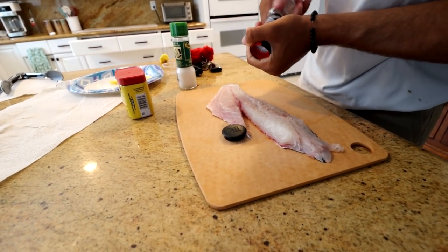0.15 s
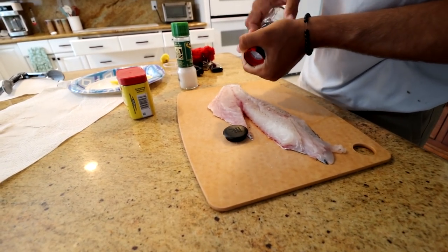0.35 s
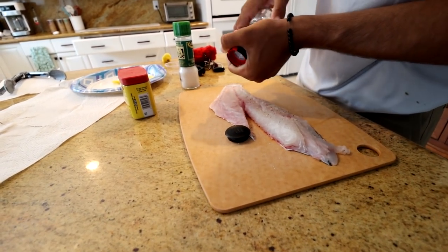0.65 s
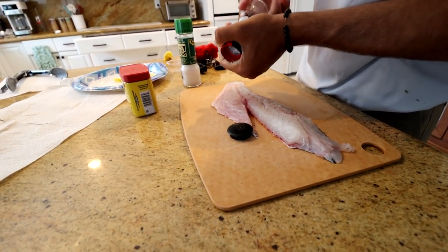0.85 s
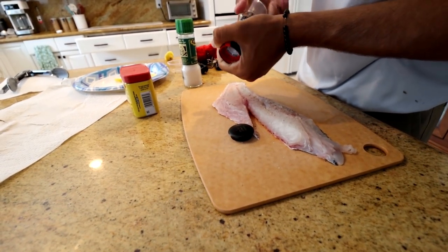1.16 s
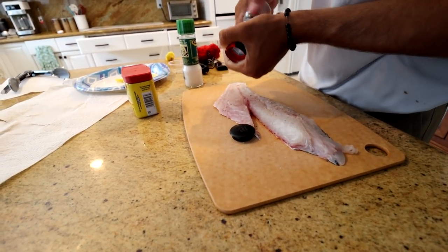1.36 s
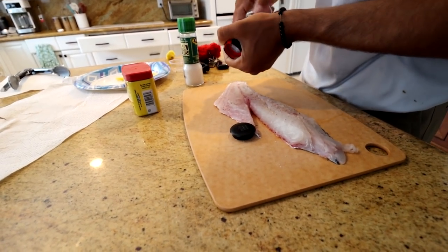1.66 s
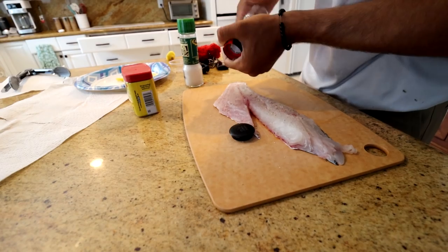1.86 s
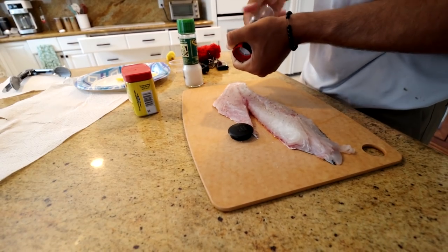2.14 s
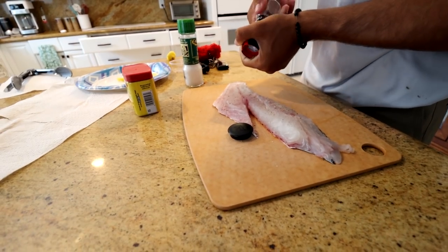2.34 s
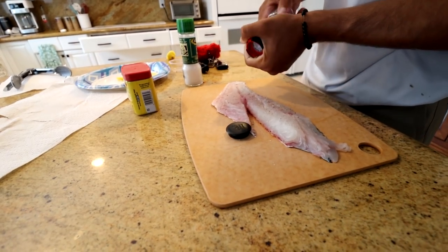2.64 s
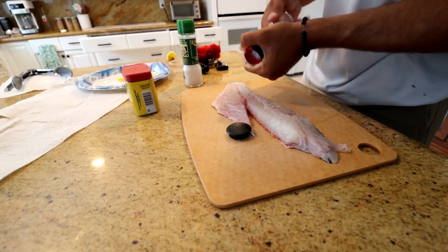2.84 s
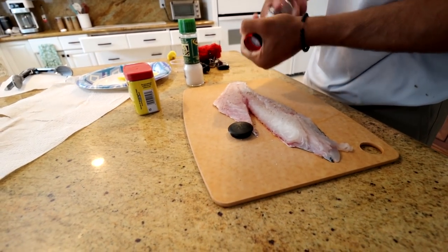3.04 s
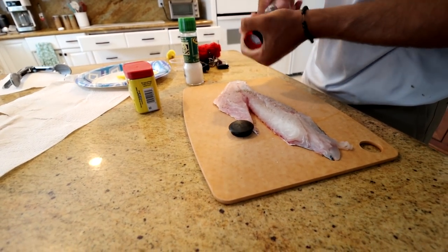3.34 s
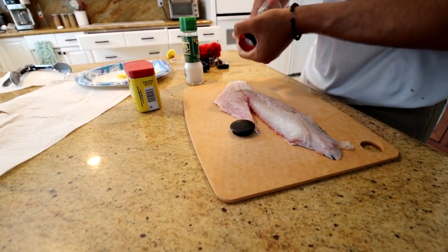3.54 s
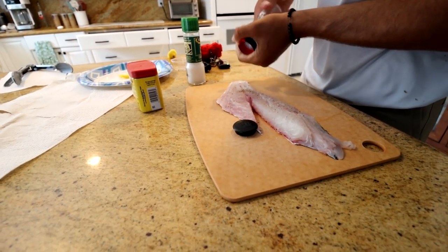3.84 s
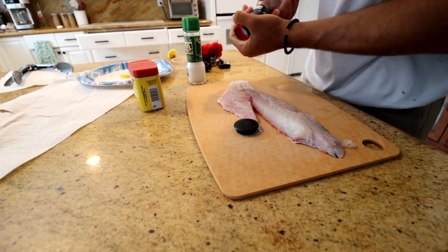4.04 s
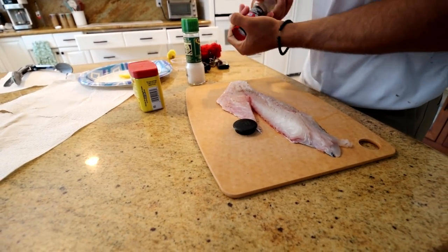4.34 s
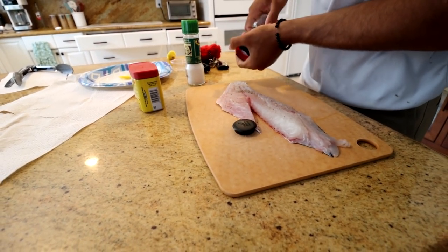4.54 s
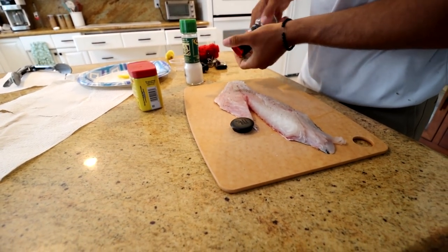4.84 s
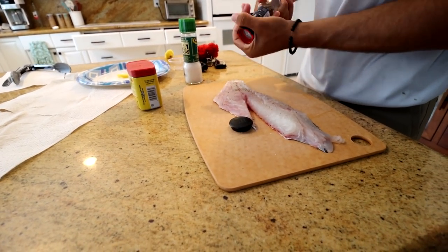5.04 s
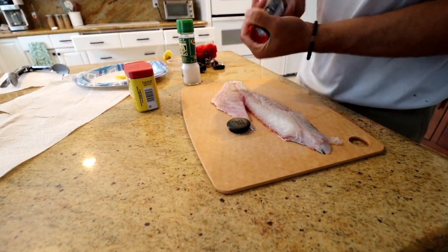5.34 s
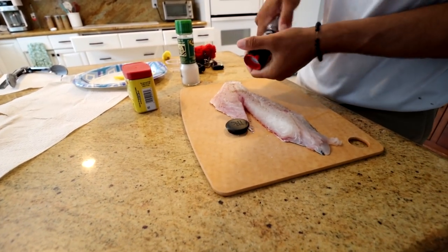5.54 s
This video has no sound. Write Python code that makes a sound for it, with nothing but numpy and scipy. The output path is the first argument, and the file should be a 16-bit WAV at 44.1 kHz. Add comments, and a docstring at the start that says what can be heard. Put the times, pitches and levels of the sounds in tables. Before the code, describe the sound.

A hand-twisted pepper grinder cracks peppercorns in steady, crunchy ratcheting bursts, about three a second, in a hard kitchen with a faint hum.

```python
"""Hand-twisted pepper grinder in a kitchen

A pepper grinder is worked over a counter, about three twists a second. Short coloured noise bursts make
peppercorns snap, crumbs crunch and loose corns tick; decaying sines make the housing thud.
Grains of contact make the hand's slides. Early echoes and a hard room ring on over an appliance hum."""
import sys
import numpy as np
from scipy import signal
from scipy.fft import rfft, irfft, next_fast_len
from scipy.io import wavfile

SR = 44100
rng = np.random.default_rng(int(sys.argv[2]) if len(sys.argv) > 2 else 0)


def persist_wave(psi):
    """Save psi, clipped to +-1, as 16-bit WAV."""
    counts = np.round(np.clip(psi, -1, 1) * 32767).astype(np.int16)
    wavfile.write(sys.argv[1], SR, np.atleast_2d(counts).T)


N = 251097

# whole peppercorns snapping: start_s, relative level_db, body_over_treble_db, sparkle_db
CRACKS = [(0.0263, -31.5, -5, -1), (0.2244, -23.5, -3, -6), (0.2612, -22.5, -2.5, -8), (.332, -29, -2, -2),
          (.52, -24.5, 1, -1), (0.5807, -22, 2, -14), (0.5853, -22.5, 8, -7), (.6059, -20.5, -3, 1),
          (0.8487, -11.5, -10.5, 4), (.8908, -24.5, -3, 10), (.902, -29, -7, 1), (.918, -22, 1, -1),
          (1.1347, -19.5, -6.5, 9), (1.1455, -10.5, -9.5, 3), (1.1733, -20, 6, -1), (1.1848, -23, 3, -5),
          (1.1951, -23, -1.5, 8), (1.201, -22, -6.5, 1), (1.2094, -23.5, 0, -1), (1.4582, -13, 7, -3),
          (1.4705, -18, -2, 2), (1.4997, -18.5, -6.5, 3), (1.7443, -26.5, -1, -2), (1.7631, -20.5, 8, -3),
          (1.7858, -21, -9, 0), (1.794, -17.5, 8, 0), (1.7987, -18, -4, 3), (1.8376, -26, -5, 10),
          (2.0662, -13, -2.5, 2.5), (2.0838, -16.5, 1, -7), (2.1075, -15.5, -2.5, 4),
          (2.1156, -15.5, -2, 2), (2.148, -25, -5, 5), (2.1683, -30, -10, -2), (2.3783, -22, -9, -16),
          (2.386, -23, -8, 7), (2.4067, -13.5, -5, 0.5), (2.4168, -22, 4, 7), (2.477, -28.5, -9, -8),
          (2.735, -23, -3.5, -2), (2.7559, -21.5, -12, 4), (2.7603, -6.5, 2, -1), (2.779, -11.5, -6, -5),
          (2.7827, -16.5, -3.5, 0), (3.0961, -22, -5, 3), (3.1173, -9, 0.5, 1), (3.176, -25, -11, -1),
          (3.187, -27, -8, 3), (3.414, -24.5, -8, -9), (3.4207, -18.5, -9.5, -10), (3.4405, -22, -1, 8),
          (3.4555, -17, -11, -8), (3.4749, -19, -2.5, 5), (3.48, -20.5, -17, -15), (3.494, -22, -1.5, 2),
          (3.516, -24.5, -8, -1), (3.7296, -24.5, -1, -3), (3.7522, -22, 15, 7), (3.7696, -13, -4, -2),
          (4.0399, -24, -2.5, -6), (4.0599, -27.5, -4, -5), (4.0885, -21, -10, 0), (4.136, -23, -0.5, 0),
          (4.3703, -20.5, -10.5, -1), (4.3813, -23, 0, -4), (4.418, -24, 0, -6), (4.4215, -22, -1.5, -5),
          (4.4402, -25, -16, -3), (4.7168, -18.5, -0.5, 1), (4.723, -20.5, -5.5, -12),
          (4.7554, -16.5, 3.5, 5), (5.0583, -27, 5, -4), (5.3992, -32.5, 3, -2), (5.4211, -12.5, -9.5, 1),
          (5.425, -13, 4.5, -3), (5.4386, -18, -2.5, 6), (5.4446, -20.5, -22, -5), (5.4513, -20, 3, -1),
          (5.4687, -21, -5, 1), (5.5489, -32.5, -3, 3)]
# twists of the burr: start_s, hardest_s, end_s, relative crunch_db, body_over_treble_db,
# body_ring_hz, burr_ring_hz, relative thud_db; one that ends before it starts has no crunch
TWISTS = [(0, 0.008, 0.024, -38, -7, 3020, 9000, -61), (0.206, .26, .3, -32, 1, 2600, 8900, -51),
          (0.517, 0.579, 0.59, -28, -1, 3560, 8700, -49), (.826, 0.851, 0.87, -24.5, -1, 3620, 8540, -43),
          (1.124, 1.143, 1.146, -25, 3, 2700, 9300, -42), (1.44, 1.471, 1.49, -22.5, -1, 2940, 9000, -47),
          (1.757, 1.768, 1.825, -24, -2.5, 3930, 7500, -34.5), (2.062, 2.1, 2.1, -31.5, 3, 2830, 8600, -48),
          (2.406, 2.418, 2.434, -20.5, 1, 2300, 7460, -39), (2.76, 2.761, 2.783, -21.5, 3, 2250, 9000, -35),
          (3.103, 3.126, 3.165, -25, -0.5, 3700, 8000, -38),
          (3.431, 3.461, 3.464, -23.5, 1, 3570, 7800, -42),
          (3.727, 3.772, 3.812, -30.5, 2.5, 3530, 7050, -48),
          (4.037, 4.11, 4.14, -31, 1.5, 2370, 8300, -46), (4.363, 4.42, 4.45, -29, -1, 1870, 8440, -47),
          (4.705, 4.708, 4.79, -27, -2, 1950, 8380, -37), (5.047, 5.061, 5.112, -33, -3, 4000, 8900, -54),
          (5.419, 5.423, 5.27, -23, 1, 1800, 9000, -49)]
# tone colour of the grinder: frequency_hz, relative density_db (per Hz)
GRINDER_COLOUR = [(120, -32), (450, -14.5), (1000, -18.5), (1320, -16.5), (1720, -2.5), (2500, -0.05),
                  (3050, -1), (3700, 0.65), (4600, -4), (6200, -5.5), (7500, 0.5), (8800, 2.5),
                  (10600, -11.5), (12200, -8), (15500, -13.5)]


def amp(db):
    """Decibels to amplitude."""
    return 10 ** (np.asarray(db) / 20)


def unit(x):
    """Scale to rms 1."""
    return x / np.sqrt(np.mean(x ** 2) + 1e-20)


def along(points, hz):
    """Read a curve of (Hz, value) points on a log frequency axis."""
    f, v = np.transpose(points)
    return np.interp(np.log(hz + 1), np.log(f + 1), v)


def add(track, s, sound):
    """Mix a sound into a track at time s, in seconds."""
    i = int(np.clip(round(s * SR), 0, N - 1))
    track[i:i + len(sound)] += sound[:N - i]


def filtered(x, response):
    """Multiply the spectrum of x by a gain that depends on frequency."""
    size = next_fast_len(N + SR // 2)
    gain = response(np.fft.rfftfreq(size, 1 / SR))
    return irfft(rfft(x, size) * gain, size)[:N]


def causal(gain_db, size=1024):
    """Minimum-phase impulse response of energy 1 with the given dB shape against Hz."""
    cepstrum = irfft(np.log(amp(gain_db(np.fft.rfftfreq(size, 1 / SR)))))
    # fold backward time onto forward time, so that the response starts at once
    cepstrum[1:size // 2] *= 2
    cepstrum[size // 2 + 1:] = 0
    return unit(irfft(np.exp(rfft(cepstrum)))) / np.sqrt(size)


def strength(x):
    """Rms of the first 2 ms."""
    return np.sqrt(np.mean(x[:SR // 500] ** 2))


def snap(body_db, sparkle_db, ring_hz, size=512):
    """One fracture: a milliseconds-long noise burst, coloured by the grinder and one resonance."""
    t60_s, rise_s = 0.0085, 0.00013
    ring_db, ring_octaves = 7.0, 0.13
    split_hz, sparkle_hz = 5500, 10000
    t = np.arange(1, size + 1) / SR
    burst = rng.standard_normal(size) * amp(-60 * t / t60_s) * (1 - np.exp(-t / rise_s))

    def colour(hz):
        # low resonances ring more clearly than high ones
        clarity = min(1, 2500 / ring_hz)
        ring = ring_db * clarity * np.exp(-(np.log2((hz + 1) / ring_hz) / ring_octaves) ** 2)
        sparkle = sparkle_db * (1 + np.tanh((hz - sparkle_hz) / 900)) / 2
        return along(GRINDER_COLOUR, hz) + ring + sparkle

    click = np.convolve(burst, causal(colour))[:size]
    # rebalance body against treble
    low_pass = 1 / (1 + (np.fft.rfftfreq(2 * size, 1 / SR) / split_hz) ** 10)
    body = irfft(rfft(click, 2 * size) * low_pass)[:size]
    treble = click - body
    click = amp(body_db) * body / strength(body) + treble / strength(treble)
    return click / strength(click)


def cracks():
    """Whole corns snap clearly, ringing the body or the burr at the pitches of the nearest twist."""
    thin_db = -1  # a snap with less body than this rings the burr
    out = np.zeros(N)
    for s, db, body_db, sparkle_db in CRACKS:
        *_, body_hz, burr_hz, _ = min(TWISTS, key=lambda twist: abs(twist[1] - s))
        ring_hz = burr_hz if body_db < thin_db else body_hz
        add(out, s, amp(db) * snap(body_db, sparkle_db, ring_hz))
    return out


def crunch(count=46):
    """Crumbs break in a quick uneven run, loudest where the hand presses hardest; chunks trail finer dust."""
    rate_hz = 330
    start_db, end_db = -5.0, -6.0  # against the hardest point
    chunk_db, dust_db = 5, -1.5
    # scatter from crumb to crumb, per standard deviation; pitch as a log ratio
    size_scatter_db, colour_scatter_db, pitch_scatter = 3.4, 3.5, 0.099
    sparkle_centre_db = -1.5
    out = np.zeros(N)
    for start, hardest, end, db, body_db, ring_hz, *_ in TWISTS:
        times = start + (np.arange(count) + rng.random(count)) / rate_hz
        pressure_db = np.interp(times, [start, hardest, end], [start_db, 0, end_db])
        gains = amp(db + pressure_db)
        gains *= np.clip((end - times) * rate_hz, 0, 1)  # the burr stops
        chunks = np.cumsum(np.r_[0, rng.integers(2, 5, count)])  # a chunk every 2 to 4 crumbs
        gains *= amp(np.where(np.isin(np.arange(count), chunks), chunk_db, dust_db))
        scatter = np.clip(rng.standard_normal((count, 4)), -1.5, 1.5)
        for s, gain, (size, colour, sparkle, pitch) in zip(times, gains, scatter):
            crumb = snap(body_db + colour_scatter_db * colour,
                         sparkle_centre_db + colour_scatter_db * sparkle,
                         ring_hz * np.exp(pitch_scatter * pitch))
            add(out, s, gain * amp(size_scatter_db * size) * crumb)
    return out


def slack():
    """The burr takes up its slack with a light tick just ahead of the first fracture of each later twist."""
    lead_s, level_db = 0.0059, -48.5  # the longest lead
    reach_s = .035  # how far from the twist's start a fracture may be
    out = np.zeros(N)
    for start, *_, burr_hz, _ in TWISTS[1:]:
        bite = min([start] + [s for s, *_ in CRACKS if abs(s - start) < reach_s])
        add(out, bite - lead_s * rng.uniform(0.36, 1), amp(level_db) * snap(-1, -5, burr_hz))
    return out


def thuds():
    """The housing jolts around a twist's hardest point and settles, ringing decaying low sine modes."""
    # low modes of the housing: pitch_multiple, relative level_db, t60_s
    housing_modes = [(.62, -11, 0.042), (.86, -1, 0.072), (1.25, 4, 0.04), (1.7, -3.5, 0.034),
                     (2.3, -3.5, 0.023)]
    base_hz, sag_hz_per_db = 129.7, 7  # pitch at a thud level of 0 dB; lighter jolts ring higher
    settle_s, settle_db = .018, -5  # the burr seats again after each jolt
    attack_s = 0.001
    out, t = np.zeros(N), np.arange(SR // 10) / SR
    for _, hardest, *_, thud_db in TWISTS:
        for s, db in [(hardest, thud_db), (hardest + settle_s, thud_db + settle_db)]:
            pitch_hz = base_hz - sag_hz_per_db * db
            ring = np.zeros(len(t))
            for multiple, level_db, t60_s in housing_modes:
                decay = amp(level_db + rng.normal(0, 3.1) - 60 * t / t60_s)
                mode_hz = multiple * pitch_hz * rng.normal(1, 0.057)
                ring += decay * np.sin(2 * np.pi * (mode_hz * t + rng.random()))
            add(out, s - .002, amp(db - 12.5) * unit(ring * (1 - np.exp(-t / attack_s))))
    return out


def grains(rate, spread_db):
    """Random tiny contacts, rate per second, ring in the grinder at rms 1."""
    sizes = rng.choice([-1, 1], N) * amp(spread_db * np.clip(rng.standard_normal(N), -2, 2))
    kicks = sizes * (rng.random(N) < rate / SR)
    ringing = causal(lambda hz: along(GRINDER_COLOUR, hz))
    return unit(signal.fftconvolve(kicks, ringing)[:N])


def handling():
    """Skin slides as swells of grains, loose corns tick at random and a fingertip lands as soft noise."""
    # hand slides on the housing: middle_s, length_s (width at 1/e), relative level_db
    slide_table = [(.005, 0.11, -37), (2.059, .02, -46.5), (4.7, 0.014, -45), (5.03, 0.052, -57),
                   (5.269, 0.049, -47), (5.38, 0.02, -44), (5.588, 0.051, -44.5)]
    # fingertip on the hopper: start_s, relative level_db, ring_hz
    fingertip = (5.291, -52, 1000)
    t = np.arange(N) / SR
    grip = sum(amp(db) * np.exp(-(2 * (t - s) / length) ** 2) for s, length, db in slide_table)
    out = amp(-2) * grip * grains(rate=1700, spread_db=3)

    for place, size, pitch in rng.random((70, 3)):
        tick = snap(-11, 3, 8000 + 1500 * pitch)
        add(out, place * N / SR, amp(-58 + 11.0 * size ** 2) * tick)

    s, db, ring_hz = fingertip
    touch = rng.standard_normal(SR // 20) * amp(-60 * t[:SR // 20] / 0.046)
    # 14 dB an octave down on either side of the ring
    pad = causal(lambda hz: -np.minimum(60, 14 * np.abs(np.log2((hz + 1) / ring_hz))))
    add(out, s, amp(db - 8.5) * unit(np.convolve(touch, pad)))
    return out


def counter(x, count=10):
    """Early copies from the hands, the board and the worktop, with new delays every 0.1 s."""
    out = np.zeros(N)
    for a in range(0, N, SR // 10):
        paths = np.zeros(SR // 20)
        delays_s = rng.uniform(.002, .016, count)
        taps = np.minimum(delays_s * SR, len(paths) - 1).astype(int)
        paths[taps] = rng.standard_normal(count)
        echoes = signal.fftconvolve(x[a:a + SR // 10], paths / np.linalg.norm(paths))
        add(out, a / SR, echoes)
    return out


def kitchen(x):
    """Diffuse room tails of fading noise; changing directions of sound meet a new tail every 1/120 s."""
    # decay of the room: frequency_hz, t60_s
    room_decay = [(300, 0.39), (800, 0.25), (1800, 0.52), (3000, 0.44), (5500, 0.48), (9000, 0.46),
                  (15000, 0.28)]
    # colour of the room's answer: frequency_hz, relative level_db
    wall_colour = [(200, -7.5), (1300, 4.5), (1750, 2.5), (3000, -2), (5700, 5), (8500, -2.5), (10000, 0),
                   (15000, 0)]
    build_s = 0.0035
    out, step = np.zeros(N), SR // 120
    hz, t, z = signal.stft(rng.standard_normal((24, SR // 2)), SR, nperseg=256)
    fade_db = along(wall_colour, hz)[:, None] - 60 * t / along(room_decay, hz)[:, None]
    fade = amp(fade_db) * (1 - np.exp(-t / build_s))
    tails = signal.istft(z * fade, SR, nperseg=256)[1]
    for k, a in enumerate(range(0, N, step)):
        tail = tails[k % len(tails)]
        add(out, a / SR, signal.fftconvolve(x[a:a + step], tail / np.linalg.norm(tail)))
    return out


def background():
    """An appliance hums in steady sines under a soft rush of air made of shaped noise."""
    # colour of the air: frequency_hz, relative density_db (per Hz)
    air_colour = [(5, -5), (28, 2), (50, -10.5), (100, -5), (160, -4.5), (350, -5), (700, -11),
                  (1300, -18.5), (1900, -18.5), (3000, -21), (8200, -28.5), (8900, -20), (10800, -29),
                  (15500, -36)]
    # hum tones: frequency_hz, rms level_db
    hum_tones = [(120, -68), (333, -70.5)]
    t = np.arange(N) / SR
    hum = np.zeros(N)
    for hz, db in hum_tones:
        hum += amp(db) * np.sqrt(2) * np.sin(2 * np.pi * (hz * t + rng.random()))
    air = filtered(rng.standard_normal(N), lambda hz: amp(along(air_colour, hz)))
    return hum + amp(-56.0) * unit(air)


def scene():
    """The grinder, its near echoes and the room, over the kitchen's hum."""
    grinder = cracks() + amp(-3.0) * crunch() + slack() + thuds() + handling()
    echoes = amp(-13) * counter(grinder)
    room = amp(-13.0) * kitchen(grinder)
    return (grinder + echoes + room + background())[None]


def record(dry):
    """Round off the highest peaks by soft saturation, then cut steeply above the band limit."""
    ceiling, top_hz = .9, 15750
    held = dry[0] / (1 + np.abs(dry[0] / ceiling) ** 6) ** (1 / 6)
    return filtered(held, lambda hz: 1 / np.sqrt(1 + (hz / top_hz) ** 200))[None]


dry = scene()
out = record(dry)
persist_wave(out)
```